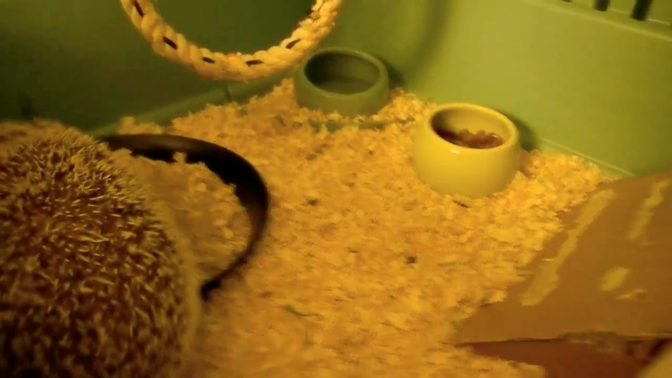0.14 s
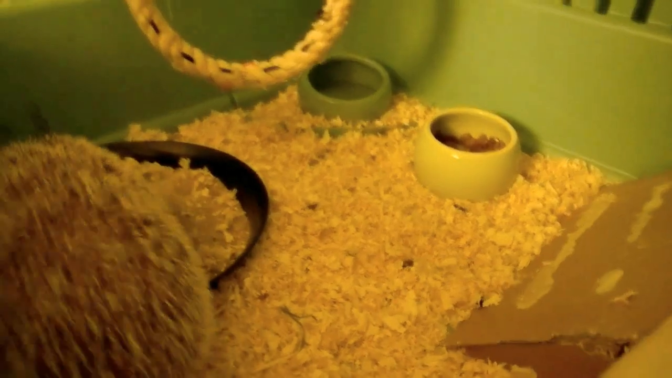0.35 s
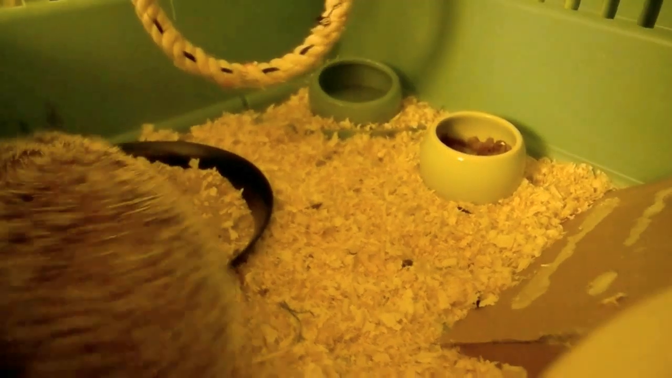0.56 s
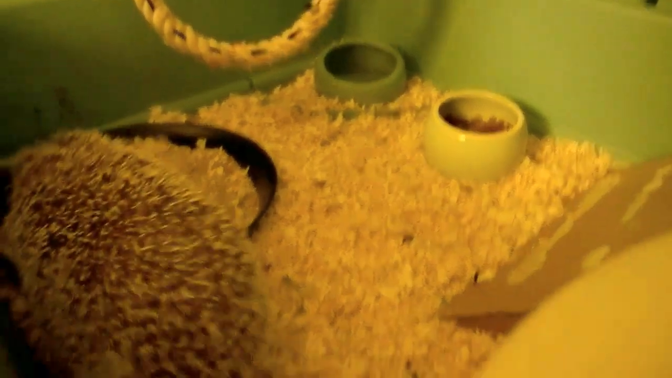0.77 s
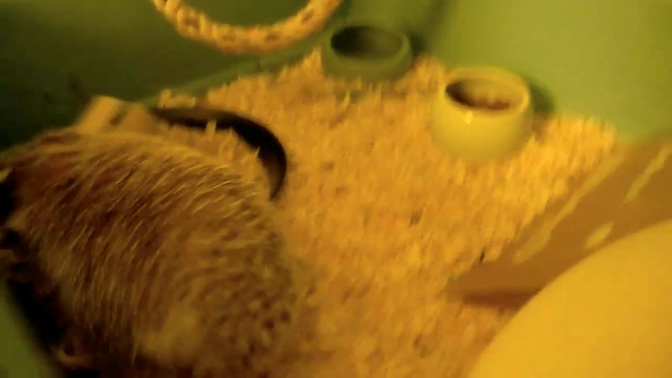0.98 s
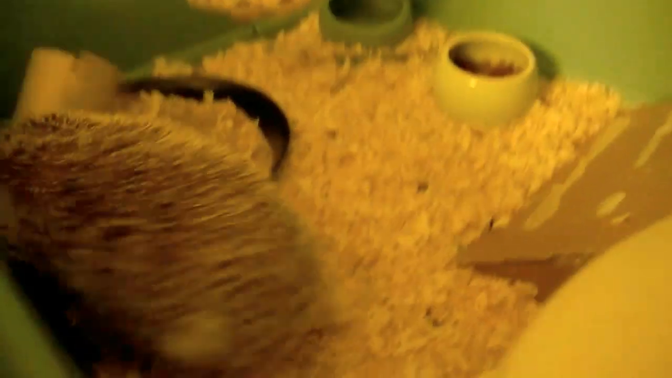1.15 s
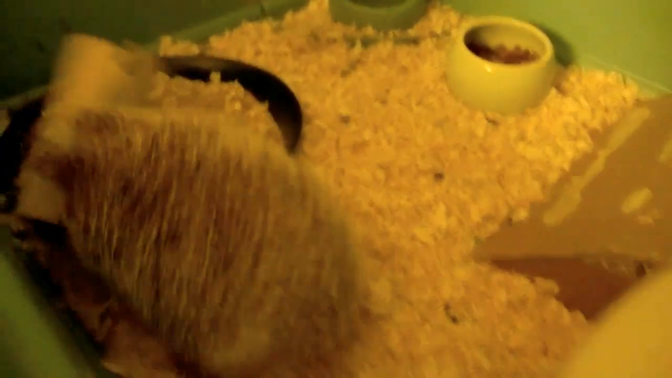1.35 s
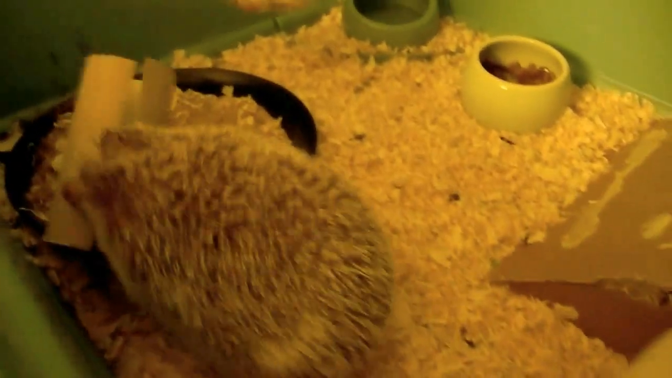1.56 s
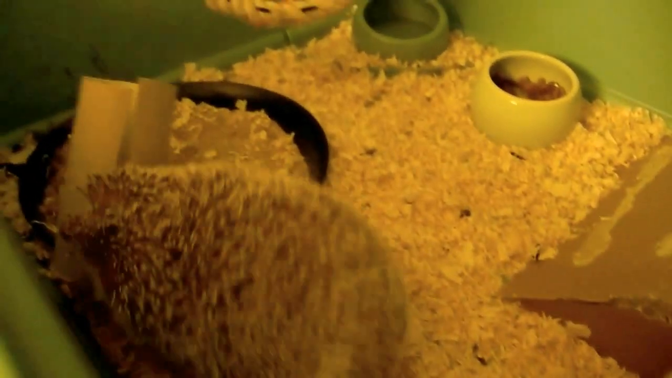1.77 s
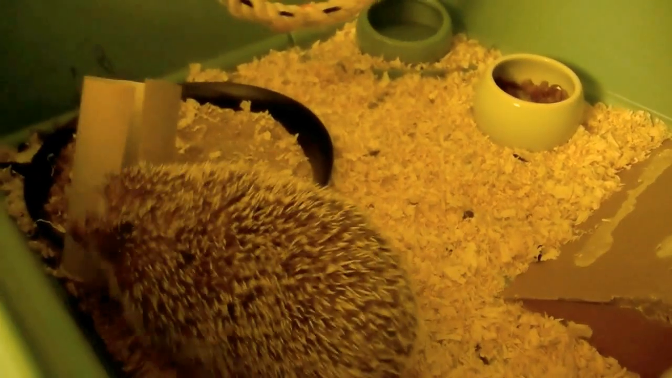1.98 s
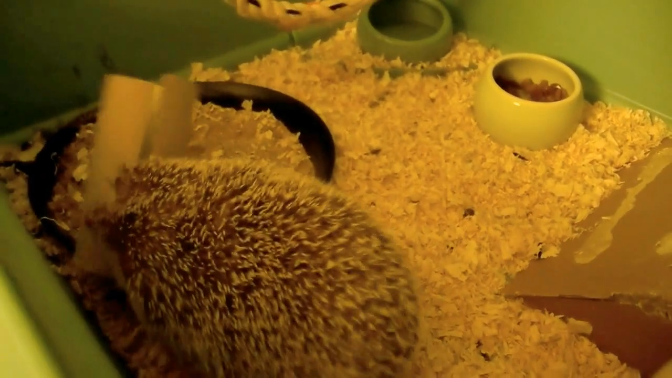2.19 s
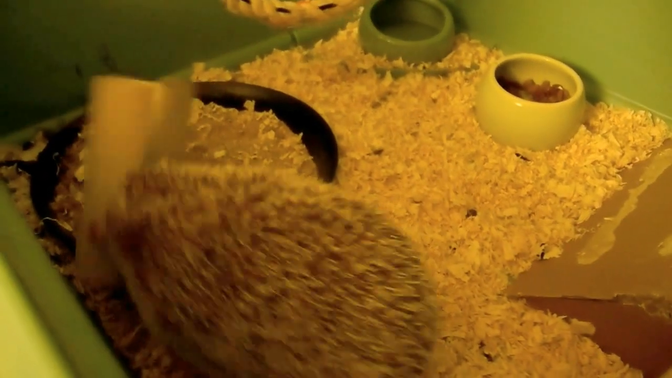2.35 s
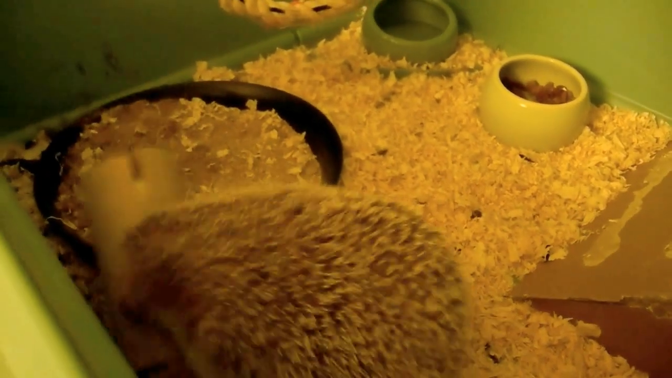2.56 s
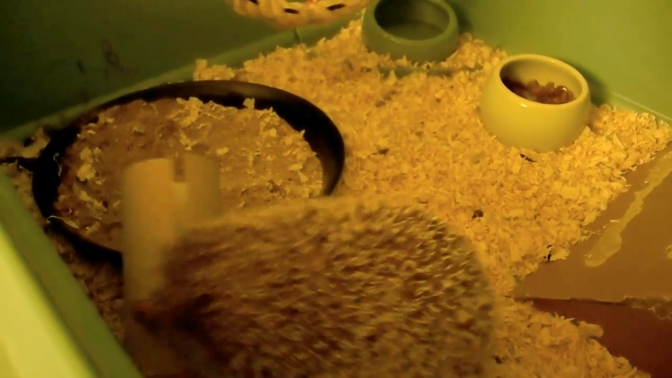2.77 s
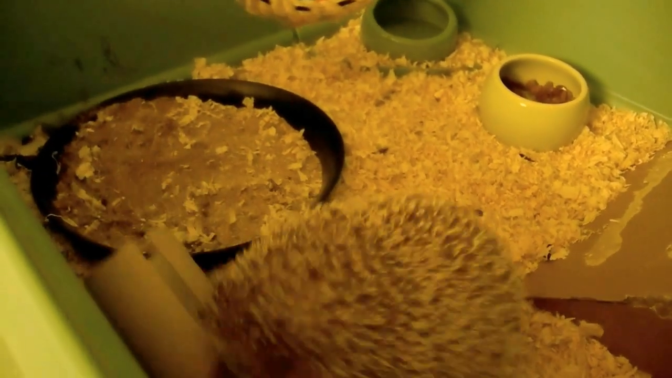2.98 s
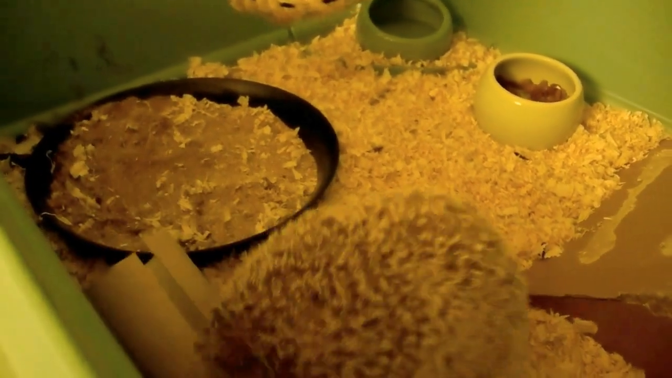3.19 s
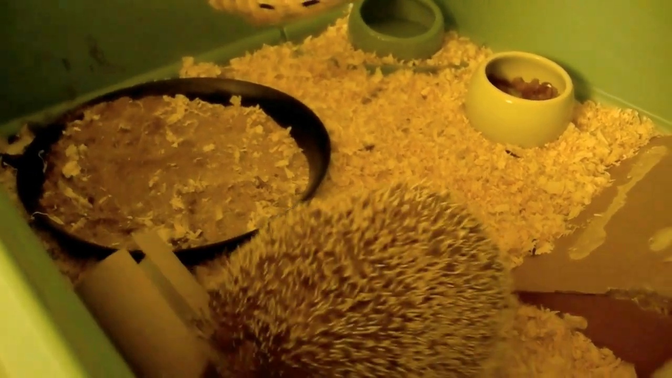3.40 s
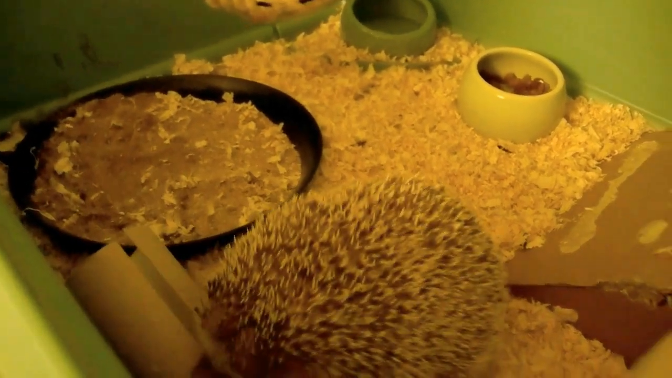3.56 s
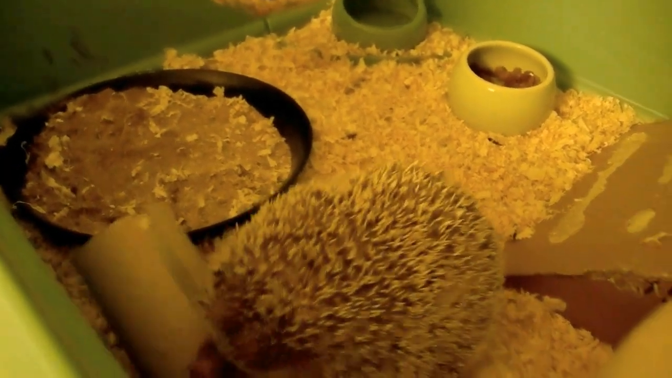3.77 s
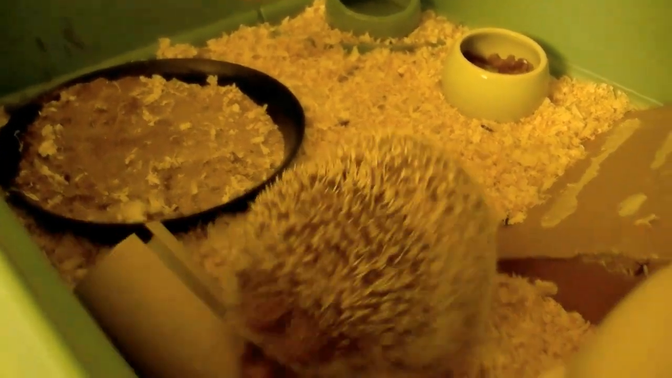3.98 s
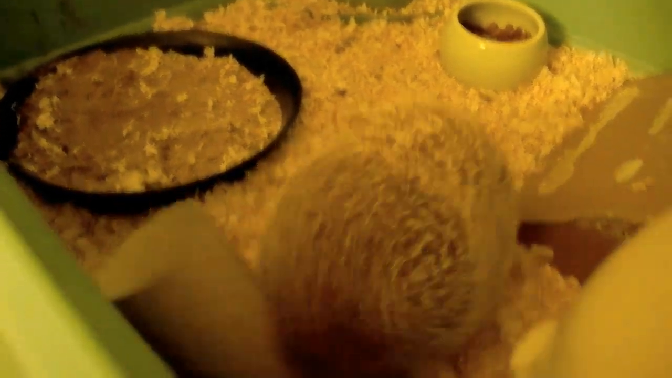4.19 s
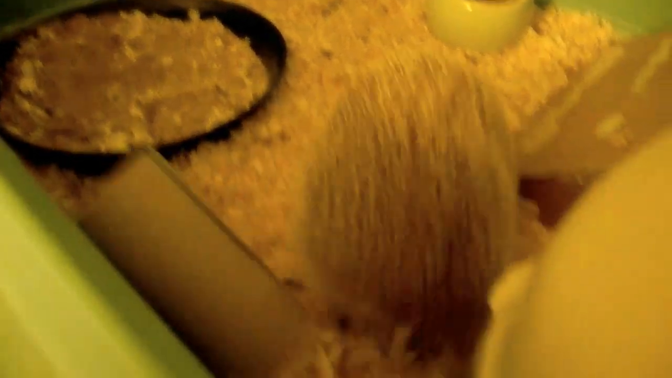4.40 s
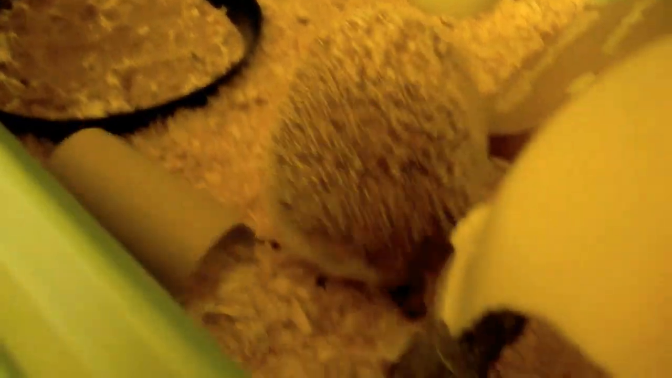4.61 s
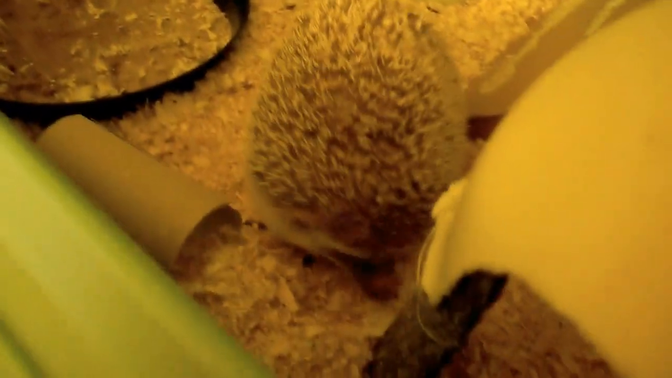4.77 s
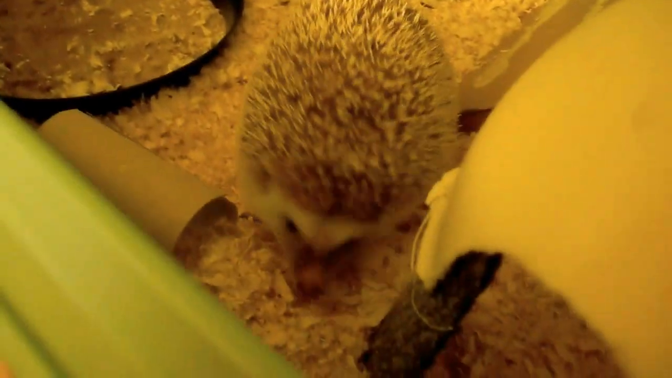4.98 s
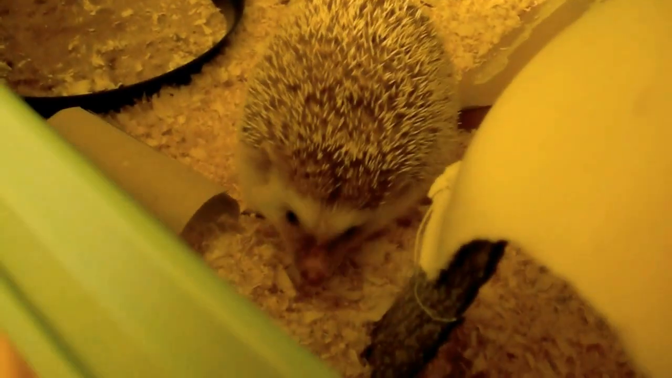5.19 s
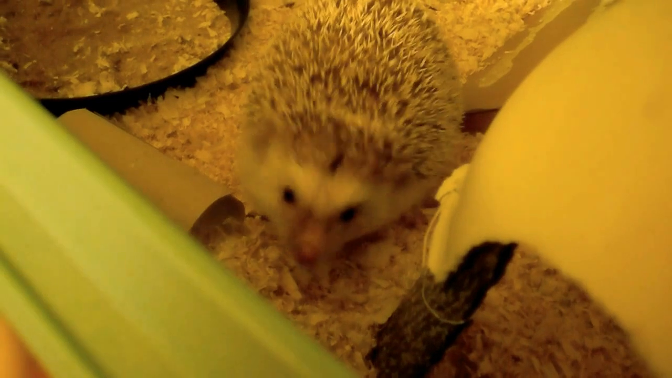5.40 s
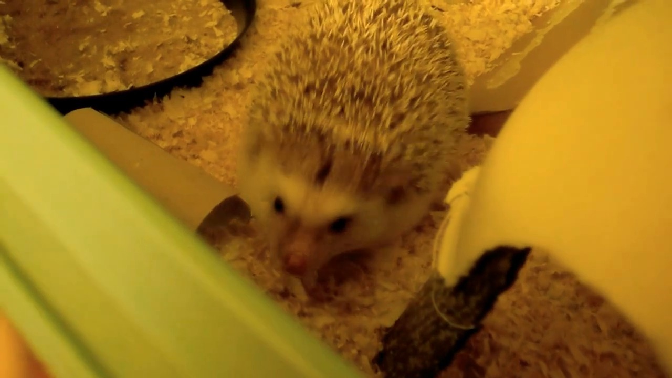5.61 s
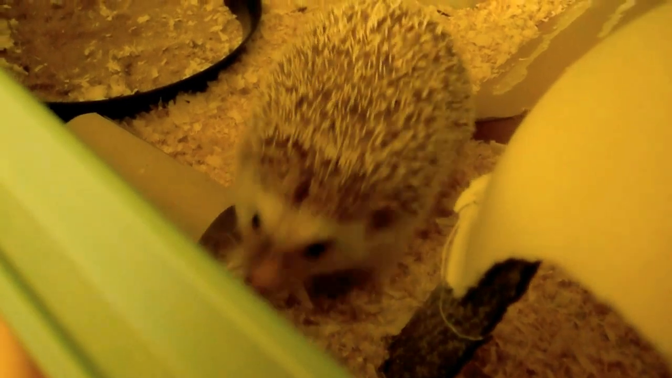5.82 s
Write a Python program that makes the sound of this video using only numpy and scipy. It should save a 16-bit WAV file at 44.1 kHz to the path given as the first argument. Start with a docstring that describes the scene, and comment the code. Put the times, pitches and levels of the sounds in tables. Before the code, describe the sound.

Dry shavings rustle and a cardboard tube scrapes and knocks in a plastic tub, ending in a hard rap and faint animal sniffs.

```python
"""A hedgehog shoves a cardboard tube through wood shavings in a plastic tub, frees itself with a sharp knock, then sniffs.
Shoves drive granular noise: banded for the rustling shavings, through tube resonances for the scrape.
Ragged bursts shake the tube as knocks and short scrapes, click brightly and make the tub floor boom.
Slides and squeaks are rough friction; sniffs are grainy noise through nose resonances.
A low shake and a quiet room lie below."""
import sys
import numpy as np
from scipy import signal
from scipy.io import wavfile
from scipy.ndimage import map_coordinates

SR = 44100
rng = np.random.default_rng(int(sys.argv[2]) if len(sys.argv) > 2 else 0)


def transcribe(signal):
    """Save signal, clipped to [-1, 1], as a 16-bit WAV file at the path in sys.argv[1]."""
    frames = np.atleast_2d(signal).T
    limited = np.clip(frames, -1, 1)
    pcm = np.round(limited * 32767).astype(np.int16)
    wavfile.write(sys.argv[1], SR, pcm)


N = 257984

# cardboard tube resonances: freq_hz, width_hz, level_db
TUBE_MODES = [(750, 222, -4), (931, 83, 1), (1088, 219, -1), (1342, 282, 3.5), (1550, 377, 0),
              (1940, 153, 0), (2344, 335, -4.5), (3426, 470, -3.5), (3890, 1740, -12)]
# plastic tub floor resonances: freq_hz, width_hz, level_db
FLOOR_MODES = [(122.5, 19, -1.5), (176, 28, 3.5), (294.8, 38, 0), (357, 26.3, 1), (413.5, 32.4, 0.5),
               (546, 380, -11.5)]
# restless shuffling between shoves: time_s, rustle_db, rumble_db, rumble_tilt_db_per_octave
SHUFFLING = [(0.03, -48, -44.5, 2.5), (0.27, -48, -41, 1.5), (0.55, -44, -45.5, 0.5), (0.86, -45, -46, -1),
             (1.18, -43.5, -44.5, 1), (1.47, -44.5, -40.5, -6), (1.81, -46.5, -45.5, 6),
             (2.07, -59, -54.5, 1), (2.44, -45, -44.5, 0), (2.62, -60.5, -43, 0.5), (2.85, -52, -101, 2),
             (3.04, -47, -51, 0.5), (3.48, -64, -50.5, 0.5), (3.79, -56, -61.5, -11), (4.02, -51, -47, 3),
             (4.28, -39.5, -43.5, -10), (4.46, -50, -40.5, -3.5), (4.75, -51, -45.5, -1),
             (5.02, -56, -59, -7.5), (5.85, -56.5, -61, 0)]
# shoves against tube and shavings: start_s, hold_s, rustle_db, scrape_db
SHOVE_EVENTS = [(0.04, 0.025, -43.5, -62), (0.118, 0.07, -37.5, -44), (0.197, 0.079, -43.5, -50),
                (0.289, 0.027, -40.5, -44.5), (0.392, 0.063, -43.5, -47.5), (0.608, 0.018, -42, -47),
                (0.653, 0.036, -39.5, -39.5), (0.717, 0.014, -32, -39.5), (0.78, 0.0068, -38, -45),
                (0.838, 0.06, -38.5, -62), (0.909, 0.06, -41.5, -40), (0.999, 0.017, -30.5, -36),
                (1.06, 0.038, -35, -44), (1.155, 0.051, -36.5, -36.5), (1.266, 0.028, -36, -41),
                (1.334, 0.063, -35, -36), (1.52, 0.032, -34, -34.5), (1.586, 0.016, -44, -37),
                (1.757, 0.015, -47, -40.5), (1.816, 0.07, -57, -43.5), (1.966, 0.057, -43, -41),
                (2.045, 0.027, -41, -38), (2.129, 0.08, -43, -41), (2.239, 0.017, -43, -39.5),
                (2.405, 0.019, -61, -43.5), (2.44, 0.037, -47, -44), (2.481, 0.069, -38.5, -39),
                (2.903, 0.025, -48, -42.5), (3.007, 0.059, -62, -50), (3.16, 0.016, -54, -54),
                (3.19, 0.05, -68, -48), (3.37, 0.05, -65, -46.5), (3.423, 0.036, -59, -48),
                (3.696, 0.014, -48, -53), (3.835, 0.042, -43, -46), (3.905, 0.049, -40, -42),
                (4.079, 0.047, -45.5, -43), (4.182, .03, -41, -43), (4.221, 0.038, -32.5, -32),
                (4.276, 0.036, -39, -50), (4.505, 0.016, -43, -64), (4.563, 0.0074, -39.5, -38),
                (4.86, 0.022, -62, -49.5)]
SHAVINGS_PAN_DB = -0.5   # left minus right


def from_db(db):
    """Amplitude ratio of a level in decibels."""
    return 10 ** (np.asarray(db) / 20)


def rms_one(x):
    """Normalization to unit root-mean-square amplitude."""
    return x / np.sqrt(np.mean(x ** 2) + 1e-20)


def in_time(rows):
    """Linear interpolation of each column over time, at every sample."""
    time_s, *columns = np.transpose(rows)
    return [np.interp(np.arange(N) / SR, time_s, column) for column in columns]


def at_hz(points, hz):
    """Interpolation along a logarithmic frequency axis."""
    freq_hz, values = np.transpose(points)
    return np.interp(np.log(hz), np.log(np.maximum(freq_hz, 1)), values)


def resonate(x, modes, tilt_db=0, pivot_hz=1400):
    """Modal superposition: parallel resonances of alternating sign, tilted in dB per octave about the pivot."""
    out = 0
    for k, (hz, width_hz, db) in enumerate(modes):
        r = np.exp(-np.pi * width_hz / SR)
        a = [1, -2 * r * np.cos(2 * np.pi * hz / SR), r * r]
        b = [(1 - r * r) / 2, 0, (r * r - 1) / 2]
        gain = (-1) ** k * from_db(db + tilt_db * np.log2(hz / pivot_hz))
        out = out + gain * signal.lfilter(b, a, x)
    return out


def decaying(impulses, length_s):
    """Exponential relaxation after each impulse, with time constant length_s."""
    r = np.exp(-1 / (length_s * SR))
    return signal.lfilter([1], [1, -r], impulses + 1e-18)


def random_contacts(per_s, spread_db, most):
    """Poisson-like contacts with exponentially distributed sizes in dB, capped at most * spread_db."""
    sizes = from_db(spread_db * np.minimum(rng.exponential(1, N), most))
    return sizes * (rng.random(N) < per_s / SR)


def grain(per_s, spread_db, length_s, bed):
    """Granular contact: an envelope of random decaying contacts over a smooth bed; rms 1."""
    contacts = random_contacts(per_s, spread_db, 4)
    return rms_one(bed + rms_one(decaying(contacts, length_s)))


def correlate(mid, side, alike):
    """Interchannel correlation set by the balance of common and opposed noise."""
    return np.sqrt(1 + alike) * mid + np.sqrt(1 - alike) * side * [[1], [-1]]


def stereo_noise(alike):
    """White noise in two channels with a given correlation."""
    mid, side = rng.standard_normal((2, N))
    return correlate(mid, side, np.clip(alike, -1, 1))


def patches(depth_db, decay_per_step):
    """Amplitude modulation by random steps, 60 a second, smoothed by a one-pole filter; depth_db is rms."""
    steps = rng.standard_normal(int(N / SR * 60) + 2)
    slow = rms_one(signal.lfilter([1], [1, -np.exp(-decay_per_step)], steps))
    return from_db(depth_db * np.interp(np.arange(N) / SR * 60, np.arange(len(slow)), slow))


def banded(spectrum, envelope, lowest_hz, patchy_db, tilt_db=0):
    """Spectral shaping: half-octave noise bands, each with its own level, correlation and flicker; rms 1."""
    # left-right likeness: freq_hz, correlation
    likeness = [(60, 1), (180, 0.55), (550, 0.58), (1650, -0.2), (4970, -0.18), (15000, -0.16)]
    out = 0
    edges = lowest_hz * 2 ** np.arange(0, np.log2(.45 * SR / lowest_hz), .5)
    white = rng.standard_normal((2, 2, N)) * envelope
    for k, (low, top) in enumerate(zip(edges, edges[1:])):
        band = signal.butter(2, [low, top], "band", fs=SR, output="sos")
        mid, side = signal.sosfilt(band, white[k % 2])
        hz = np.sqrt(low * top)
        alike = np.clip(at_hz(likeness, hz), -1, 1)
        gain = from_db(at_hz(spectrum, hz) + tilt_db * np.log2(hz / 7000)) * patches(patchy_db, 2.3)
        out = out + gain * correlate(mid, side, alike)
    return rms_one(out)


def panned(pan_db):
    """Level difference between the channels, left minus right."""
    return from_db([[pan_db / 2], [-pan_db / 2]])


def add(out, s, sound, peak_db, pan_db):
    """Linear superposition of a short sound, scaled to its peak level and panned."""
    at = round(s * SR)
    sound = sound[..., :N - at] * from_db(peak_db) / np.abs(sound).max()
    out[:, at:at + sound.shape[-1]] += sound * panned(pan_db)


def burst(noise, length_s):
    """Ragged contact force: noise that swells for a fraction of its length and decays."""
    t = np.arange(noise.shape[-1]) / SR / max(length_s, .00015)
    return noise * t ** 0.76 * np.exp(-t)


def swells(rows, rise=0.34, fall=0.44):
    """Gaussian envelopes from centre_s, level_db, length_s; rise and fall are shares of the length."""
    t, out = np.arange(N) / SR, 0
    for s, db, length in rows:
        spread_s = np.where(t < s, rise, fall) * length
        out = out + from_db(db) * np.exp(-.5 * ((t - s) / spread_s) ** 2)
    return out


def high(x, hz):
    """Second-order high-pass filtering."""
    return signal.sosfilt(signal.butter(2, hz, "high", fs=SR, output="sos"), x)


def drag(noise, modes, bright_db, pivot_hz, patchy_db):
    """Moving excitation: the contact point wanders, so every resonance swells and fades on its own."""
    out = 0
    for k, mode in enumerate(modes):
        out = out + (-1) ** k * patches(patchy_db, 0.215) * resonate(noise, [mode], bright_db, pivot_hz)
    return out


def shoving(steady_db, levels_db):
    """Power addition: each shove rises fast, holds and falls away over the steady shuffling."""
    rise_db_per_s, fall_db_per_s = 893, 334
    t, power = np.arange(N) / SR, from_db(2 * steady_db)
    for (s, hold, *_), db in zip(SHOVE_EVENTS, levels_db):
        near = slice(max(round((s - .1) * SR), 0), round((s + hold + .2) * SR))
        before_s = np.maximum(s - t[near], 0)
        after_s = np.maximum(t[near] - s - hold, 0)
        loss_db = rise_db_per_s * before_s + fall_db_per_s * after_s
        power[near] += from_db(2 * (db - loss_db))
    return np.sqrt(power)


def scrape(stirred, dragged):
    """Friction excitation: the tube drags in uneven slips, brighter where rustle outweighs scrape."""
    rustle_over_scrape_db = 20 * np.log10(stirred / dragged)
    tilt_db = np.clip(-1.1 + 0.25 * rustle_over_scrape_db, -14, 6)   # per octave
    rubbing = stereo_noise(0.46) * grain(350, 5.5, 0.005, 1.2)
    return dragged * rms_one(drag(rubbing, TUBE_MODES, tilt_db, 1200, 2.65))


def tube_contacts():
    """Modal excitation: a contact weights tube resonances by distance from a pitch; a dry crack rides on top."""
    # contacts on the tube, sharp knocks and short, ragged scrapes:
    # start_s, level_db, spot_hz, focus_db_per_octave, contact_ms
    contact_events = [(0.146, -23, 1510, 17, 0.96), (0.615, -28.5, 1080, 15, 1.4),
                      (0.655, -23.5, 1600, 19, 1.4), (0.666, -14.5, 2000, 7, 0.24),
                      (0.668, -18, 1700, 11, 0.43), (0.6728, -29, 1300, 6, 0.44),
                      (1.0079, -14.5, 2400, 1.5, 1.8), (1.021, -24.5, 1210, -5, 1),
                      (1.1535, -18.5, 1960, 9, 2.1), (1.1985, -11.5, 2000, 3, 0.61),
                      (1.269, -26, 891, 8, 1.8), (1.361, -27, 1500, 10, 0.95), (1.3805, -18.5, 1700, 7, .9),
                      (1.449, -31, 830, 6, 1.5), (1.506, -23, 907, 8, 0.64), (1.55, -21.5, 1300, 35, 1.2),
                      (1.594, -26.5, 1140, 9, 1.4), (1.772, -28, 720, 31, 1), (2.004, -25, 1520, 6, 3),
                      (2.047, -26, 1520, 10, 1.3), (2.058, -26.5, 1350, 19, 3.8),
                      (2.402, -23, 815, 5, 0.61), (2.5716, -22, 1960, 4, 1.1),
                      (2.6067, -21, 900, 4.5, 0.57), (2.912, -28, 750, 14, 0.8),
                      (2.922, -33, 1200, 18, 1.3), (2.998, -32.5, 600, 8, 1.1),
                      (3.361, -34.5, 850, 24, 1.2), (3.387, -41, 720, 26, 0.96),
                      (3.7028, -29, 2060, 6.5, 0.19), (3.872, -32, 856, 6, 2.2),
                      (4.018, -38.5, 902, 14, .8), (4.08, -30.5, 1590, 15, .8),
                      (4.2316, -8.5, 1450, 14.5, 0.23), (4.2345, -8, 1330, 11, 0.19),
                      (4.2361, -7.5, 1400, 11, 0.2), (4.239, -14, 1300, 4, 0.41),
                      (4.568, -26, 1480, 11, 1.9)]
    # where the tube lies: time_s, left_minus_right_db
    tube_pan = [(0, -1), (1.1, 3.5), (1.4, 6.5), (2.4, 2), (2.7, 0), (4.2, -3), (4.6, 0)]
    crack_db, damping = -9.5, 1.32   # crack re body peak; the animal's weight widens the resonances
    out, noise = np.zeros((2, N)), rng.standard_normal((len(contact_events), 2, 3000))
    for (s, db, spot_hz, focus_db, contact_ms), (body, crack) in zip(contact_events, noise):
        excited = [(hz, damping * width, mode_db - focus_db * abs(np.log2(hz / spot_hz)))
                   for hz, width, mode_db in TUBE_MODES]
        pan_db = np.interp(s, *np.transpose(tube_pan))
        contact_s = contact_ms / 1000
        add(out, s, resonate(burst(body ** 3, contact_s), excited), db, pan_db)
        add(out, s, high(burst(crack, contact_s), 2000), db + crack_db, pan_db)
    return out


def walls(x):
    """Early reflection: the near tub walls answer within milliseconds, differently for each microphone."""
    # reflections: left_s, right_s, level_db
    wall_echoes = [(.0011, .0017, -28), (.0041, .0049, -11)]
    out = x.copy()
    for k, (*lags, db) in enumerate(wall_echoes):
        for side, lag in enumerate(lags):
            delay = round(lag * SR)
            out[side, delay:] += (-1) ** (k + side) * from_db(db) * x[side, :N - delay]
    return out


def aside(x):
    """Interaural-style time difference: sound from one side reaches one microphone a little sooner."""
    # travel difference: time_s, left_ahead_s
    tube_lag = [(0, .00004), (2.4, .00004), (3.5, -.00002), (5.85, -.00008)]
    delayed_at = np.arange(N) - SR * in_time(tube_lag)[0]
    return np.array([x[0], map_coordinates(x[1], [delayed_at], order=3, mode="nearest")])


def crackle():
    """Random fracture: single shavings tick, each with a pitch region and a side of its own; rms 1."""
    sizes = random_contacts(600, 6.1, 3) * from_db(rng.normal(0, 2.9, (2, N)))
    region = rng.integers(0, 8, N)
    noise, out = stereo_noise(0.063), 0
    for k, hz in enumerate(np.geomspace(1800, 13000, 8)):
        ticks = noise * decaying(sizes * (region == k), 0.0025)
        out = out + resonate(ticks, [(hz, 0.5 * hz, 0)], -1.2)
    return rms_one(out)


def rustle(stirred):
    """Granular friction: dense contacts of shavings as banded noise, with single crackles above it."""
    # colour of the shavings: freq_hz, level_db
    shavings = [(1470, -34), (2500, -5.5), (3570, -8), (3860, -3.5), (5560, -14.5), (5970, -5),
                (13300, -7.5), (16000, -7.5)]
    # brightness of the rustle: time_s, tilt_db_per_octave
    rustle_tilt = [(0, 1.5), (1, 0.5), (1.8, -2), (2.3, -0.5), (3.2, 2), (3.8, -1), (4.3, 0), (4.9, 1),
                   (5.85, 1.5)]
    grains = grain(320, 3.2, 0.021, 3.9)
    bed = banded(shavings, grains, 2457, 2.1, in_time(rustle_tilt)[0])
    return stirred * (bed + from_db(-6.5) * crackle()) * panned(SHAVINGS_PAN_DB)


def clicks():
    """Impulsive broadband excitation: bright, dry bursts, each through one broad resonance."""
    # bright, dry clicks, the cracks of knocks on the tube and snapping shavings:
    # start_s, level_db, length_s, pitch_hz
    click_events = [(0.143, -25, 0.0032, 10000), (0.621, -20.5, 0.0036, 10600),
                    (0.784, -25.5, 0.0018, 10800), (0.994, -25, 0.0022, 9100), (1.009, -19, 0.0016, 5600),
                    (1.064, -20, 0.0014, 8000), (1.105, -24, 0.0024, 8500), (1.153, -22.5, 0.0022, 5960),
                    (1.2695, -27, .003, 6000), (1.885, -34, .0005, 13400), (2.046, -28, .003, 4200),
                    (2.362, -25.5, 0.00085, 13600), (3.042, -35, .0007, 13800), (3.9115, -26, 0.0023, 8400),
                    (4.2346, -12, 0.0013, 5450), (1.334, -16, 0.0002, 6000), (2.5395, -22, 0.0016, 8900),
                    (2.5714, -7, 0.00038, 10850), (2.573, -19, 0.002, 8000), (3.6855, -36, 0.0011, 2300),
                    (3.7035, -32, 0.0012, 13000), (3.716, -37, 0.0013, 8040), (4.252, -19.5, 0.01, 6860)]
    out, noise = np.zeros((2, N)), rng.standard_normal((len(click_events), 2, 3000))
    for (s, db, length, hz), pair in zip(click_events, noise):
        crack = high(burst(pair + 0.12 * pair[::-1], length), 1760)
        add(out, s, 0.5 * crack + resonate(crack, [(hz, 0.27 * hz, 0)]), db, SHAVINGS_PAN_DB)
    return out


def slides():
    """Narrow-band friction: a hollow resonance glides in pitch as the tube slides over the tub floor."""
    # slides: centre_s, level_db, length_s, first_hz, last_hz
    slide_events = [(2.176, -45, 0.079, 440, 393), (2.35, -47.5, 0.16, 324, 350),
                    (2.456, -49, .05, 364, 400), (2.542, -40.5, 0.049, 370, 336),
                    (3.385, -46, 0.09, 899, 600), (3.446, -44.5, 0.068, 367, 427)]
    out, t = np.zeros(N), np.arange(N) / SR
    white = rng.standard_normal((len(slide_events), 2, N)) * grain(290, 3.6, .003, 1.3)
    for (s, db, length, first_hz, last_hz), pair in zip(slide_events, white):
        hz = np.interp(t, [s - length / 2, s + length / 2], [first_hz, last_hz])
        # slow noise on two quadrature carriers makes a band around the gliding pitch
        slow = signal.butter(2, 0.17 * first_hz, fs=SR, output="sos")
        real, imag = rms_one(signal.sosfilt(slow, pair))
        phase = 2 * np.pi * np.cumsum(hz) / SR
        out += swells([(s, db, length)]) * (real * np.cos(phase) + imag * np.sin(phase))
    return out


def squeaks():
    """Rubbing friction: fine-grained noise excites narrow high resonances as the tube rubs."""
    # thin squeaks: centre_s, level_db, length_s
    squeak_events = [(2.05, -37, 0.051), (2.51, -34.5, 0.04), (4.428, -48, 0.075), (4.49, -44, 0.033),
                     (4.53, -56, 0.075), (4.635, -51, 0.1), (4.772, -48.5, 0.05)]
    # squeak resonances: freq_hz, width_hz, level_db
    squeak_modes = [(3490, 150, 7.5), (3780, 140, 7), (4300, 430, -2)]
    rubbing = stereo_noise(0.1) * grain(560, 1.9, 0.0011, 0.66)
    return swells(squeak_events, 0.094, 0.44) * rms_one(drag(rubbing, squeak_modes, 0, 3600, 1.2))


def thuds():
    """Impulsive excitation: a soft, one-sided push of the body sets the tub floor booming."""
    # bumps on the floor: start_s, level_db, length_s, tilt_db_per_octave
    thud_events = [(0.625, -34, 0.004, -14), (1.21, -25.5, 0.002, 11), (1.217, -21.5, 0.0041, 3.5),
                   (1.507, -30.5, 0.0024, 13), (2.995, -29.5, 0.0092, 1), (3.875, -20, 0.0056, 2),
                   (3.92, -32, 0.0071, -9), (3.977, -37, 0.011, -4), (4.248, -21, 0.0038, -2),
                   (4.269, -27, 0.0034, 0), (4.293, -33.5, 0.021, 7), (4.327, -34, 0.0063, -6),
                   (4.431, -33.5, 0.0028, 1), (4.557, -26.5, 0.0081, 2)]
    out, noise = np.zeros((2, N)), rng.standard_normal((len(thud_events), 12000))
    for (s, db, length, bright_db), push in zip(thud_events, noise):
        boom = resonate(burst(push + 2.05, length), FLOOR_MODES, bright_db, 240)
        add(out, s, high(boom, 176), db, 0)
    return out


def rumble(rumble_db, tilt_db):
    """Structural resonance: uneven tramping of the feet drives the tub floor."""
    tramping = stereo_noise(0.87) * grain(83, 0.91, 0.058, 0.28)
    return from_db(rumble_db) * rms_one(drag(tramping, FLOOR_MODES, tilt_db, 230, 3.1))


def sniffs():
    """Source and filter: grainy breath noise passes through the resonances of the nose."""
    # sniffs: centre_s, level_db, length_s
    sniff_events = [(4.725, -43.5, 0.058), (5.022, -42, 0.053), (5.10, -46, 0.093), (5.19, -43.5, 0.066),
                    (5.362, -45, 0.054), (5.44, -51, 0.11), (5.525, -43.5, 0.06), (5.63, -50.5, 0.059),
                    (5.675, -44.5, 0.053), (5.82, -49.5, 0.17)]
    # nose resonances: freq_hz, width_hz, level_db
    nose_modes = [(486, 69, 9), (1124, 43, 11.5), (1520, 290, 6), (4600, 3700, -3.5), (7400, 1700, -2.5),
                  (10600, 1900, -2), (12900, 3200, -15.5), (15100, 880, -7)]
    breath = stereo_noise(0.062) * grain(300, 3.0, .004, 1.5)
    return swells(sniff_events, 0.24, 0.36) * rms_one(resonate(breath, nose_modes))


def handling():
    """Low-frequency vibration: band-passed noise for the shake of hand-held microphones."""
    # shake: time_s, level_db
    shake_levels = [(0.03, -52.5), (0.51, -65), (0.64, -46), (0.81, -61), (1.21, -48.5), (2.02, -64),
                    (2.57, -48), (2.7, -71), (4.49, -50.5), (4.75, -60.5), (5.85, -64)]
    band = signal.butter(2, [35, 85], "band", fs=SR, output="sos")
    return from_db(in_time(shake_levels)[0]) * rms_one(signal.sosfilt(band, stereo_noise(0.63)))


def room():
    """Ambient noise floor: steady, spectrally shaped noise of a quiet room."""
    # room colour: freq_hz, level_db
    room_spectrum = [(12, -38), (20, -61), (77, -5.5), (158, 5.5), (255, -3), (310, 0.5), (410, 1),
                     (558, -10), (873, -2.5), (2670, -21.5), (9950, -21), (14300, -33), (16000, -53)]
    return from_db(-52) * banded(room_spectrum, 1, 23.3, 0.98)


def scene():
    """Superposition of all sources; shared shove envelopes couple the rustle and the scrape."""
    rustle_db, rumble_db, rumble_tilt_db = in_time(SHUFFLING)
    *_, shove_rustle_db, shove_scrape_db = np.transpose(SHOVE_EVENTS)
    stirred = shoving(rustle_db, shove_rustle_db)
    dragged = shoving(rustle_db - 2.5, shove_scrape_db)   # the tube drags along with the shuffling
    tube = aside(scrape(stirred, dragged) + walls(tube_contacts()))
    bright = rustle(stirred) + clicks()
    friction = slides() + squeaks()
    floor = thuds() + rumble(rumble_db, rumble_tilt_db)
    return tube + bright + friction + floor + sniffs() + handling() + room()


def record(dry):
    """Band limitation: a steep low-pass cuts the top, and a short fade-in follows initial silence."""
    start_s, fade_s, cutoff_hz = 0.021, 0.0049, 16300
    opened = np.clip((np.arange(N) / SR - start_s) / fade_s, 0, 1)
    return signal.sosfilt(signal.cheby2(20, 70, cutoff_hz, fs=SR, output="sos"), dry) * opened


dry = scene()
out = record(dry)
transcribe(out)
```